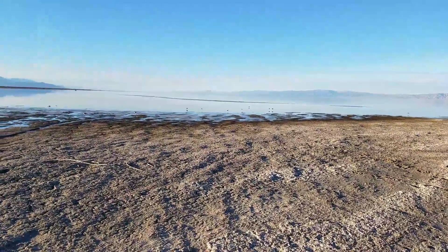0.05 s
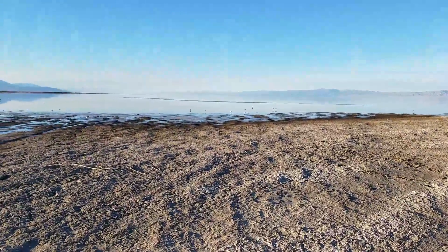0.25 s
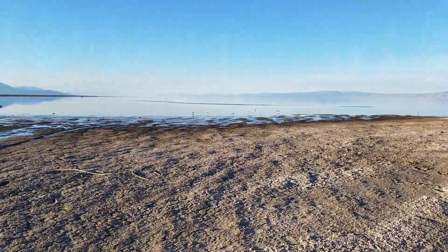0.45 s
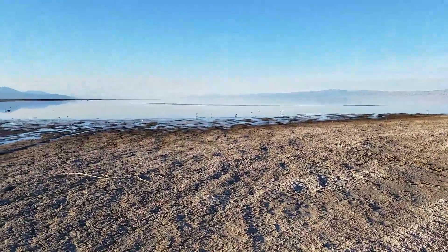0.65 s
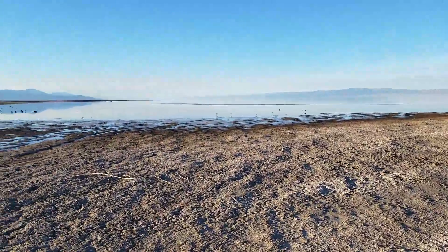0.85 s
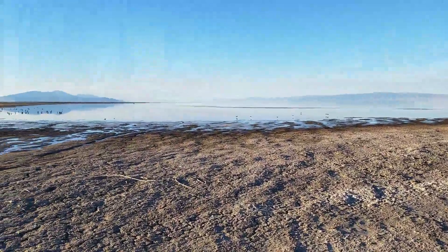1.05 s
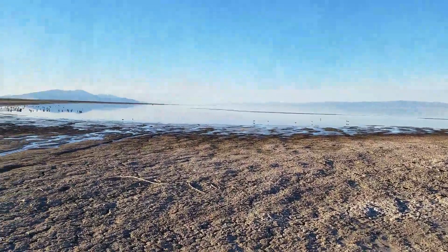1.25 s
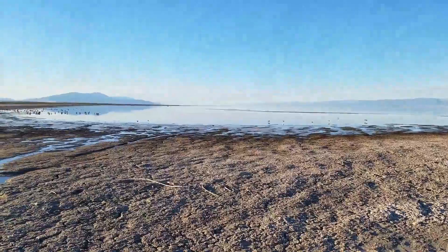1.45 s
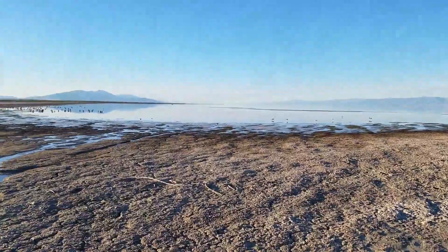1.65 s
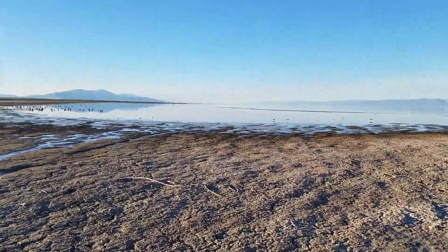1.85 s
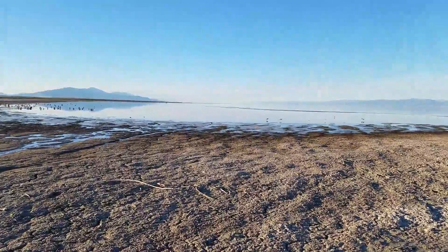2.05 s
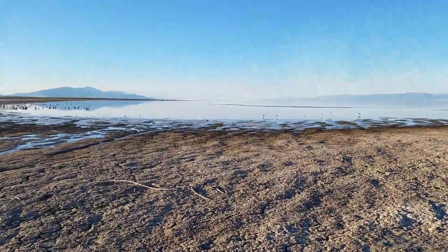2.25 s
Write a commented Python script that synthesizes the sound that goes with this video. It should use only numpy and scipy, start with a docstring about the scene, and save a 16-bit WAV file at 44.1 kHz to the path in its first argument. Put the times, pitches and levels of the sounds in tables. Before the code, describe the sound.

Slow footsteps crunch on dry, crusty ground, heard close up outdoors. The first and longest step crackles from about 0.2 to 0.7 seconds, the second from 1.0 to 1.4, and the third from 1.8 to 2.1. Each mixes brittle snaps and crumbling grit with a soft, dull knock of the sole. Loose crumbs tick between the steps, over a very faint hiss of air.

```python
"""Dry crust crackles and snaps under three slow steps on a lake shore, heard from the walker's hand.
Each foot crushes the crust into crumbs and fine grit, and plates of it break with a click.
The sole knocks on the firmer ground below, and loose crumbs tick between the steps.
Behind it all, light air hisses and brushes the microphone."""
import sys
import numpy as np
from scipy import signal
from scipy.fft import rfft, irfft, next_fast_len
from scipy.io import wavfile
from scipy.ndimage import uniform_filter1d

SR = 44100
rng = np.random.default_rng(int(sys.argv[2]) if len(sys.argv) > 2 else 0)


def pcm_store(signal):
    """Save signal as 16-bit PCM."""
    levels = np.round(np.clip(np.atleast_2d(signal), -1, 1) * 32767)
    wavfile.write(sys.argv[1], SR, levels.astype(np.int16).T)


N = 101429
TIME = np.arange(N) / SR


def from_db(db):
    """Turn decibels into a number to multiply by."""
    return 10 ** (np.asarray(db) / 20)


def unit_power(x):
    """Scale a sound so that its average power is 1."""
    return x / np.sqrt(np.mean(x ** 2) + 1e-20)


def colour(x, points, share=1):
    """Turn lows and highs up or down along (pitch_hz, gain_db) points; share scales the decibels."""
    size = 2 * next_fast_len(x.shape[-1])
    hz, db = np.transpose(points)
    outline = np.interp(np.log(np.arange(size // 2 + 1) * SR / size + 1), np.log(hz), db)
    cepstrum = irfft(np.log(from_db(share * outline)))
    cepstrum[1:size // 2] *= 2  # folded forward, so nothing rings ahead of a click
    cepstrum[size // 2 + 1:] = 0
    return irfft(rfft(x, size) * np.exp(rfft(cepstrum)))[..., :x.shape[-1]]


def ring(x, hz, cycles):
    """Make a sound ring at one pitch, fading by 60 dB in so many cycles."""
    r = np.exp(-np.log(1000) * hz / (cycles * SR))
    feedback = [1, -2 * r * np.cos(2 * np.pi * hz / SR), r * r]
    return signal.lfilter(np.array([1, 0, -1]) * (1 - r * r) / 2, feedback, x + 1e-18)


def stereo(mid, side, width):
    """Make left and right from a shared part (mid) and an opposite part (side)."""
    return np.array([mid + width * side, mid - width * side]) / np.sqrt(1 + width ** 2)


def add(out, start_s, level_db, sound, window_s=0.002):
    """Mix in a short sound; its level is its energy spread over window_s."""
    start = int(start_s * SR)
    power = np.sum(np.mean(np.atleast_2d(sound) ** 2, axis=0)) / (window_s * SR)
    out[:, start:start + sound.shape[-1]] += from_db(level_db) * sound[..., :N - start] / np.sqrt(power)


def swells(rows):
    """A volume curve with one smooth rise and fall for each row."""
    return sum(from_db(db) * np.exp(-((TIME - peak_s) / half_s) ** 2) for peak_s, db, half_s in rows)


def clicks(per_s):
    """Clicks of random size at random times."""
    return rng.standard_normal(N) * (rng.random(N) < per_s / SR)


# how the sound leans to the right, before each side takes its share: pitch_hz, lean_db
RIGHT_LEAN = [(120, 3), (500, 1.5), (1400, 3.5), (2900, 5.5), (4500, 1.5), (5900, 10.5), (7700, 10.5),
              (9200, 2.5), (12000, -8.5), (15000, 5)]

def microphone(pair, share=1):
    """Each side of the microphone colours the sound in its own way."""
    left, right = pair
    return np.array([colour(left, RIGHT_LEAN, -0.76 * share), colour(right, RIGHT_LEAN, 0.63 * share)])


# tone of the hiss and of the puffs: pitch_hz, gain_db
HISS_COLOUR = [(60, 0.5), (380, 1.5), (700, -2.5), (1800, -4.5), (3200, -8), (5000, -17.5), (10000, -18),
               (16000, -12.5)]
PUFF_COLOUR = [(35, -13), (65, 5), (120, -2.5), (220, -38.5)]
# puffs of air: peak_s, level_db, half_length_s
PUFFS = [(1.405, -60.5, 0.021), (1.513, -66, 0.015), (1.795, -63, 0.025)]

def air(hiss_db=-66):
    """Open air hisses quietly, and soft, low puffs brush the microphone."""
    hiss = unit_power(colour(stereo(*rng.standard_normal((2, N)), width=0.75), HISS_COLOUR))
    rumble = unit_power(colour(rng.standard_normal((2, N)), PUFF_COLOUR))
    return from_db(hiss_db) * hiss + swells(PUFFS) * rumble


def reflections(x, level_db=-11.5, fade_s=0.015):
    """The rough ground and the walker's body throw back a faint, very short echo."""
    t = TIME[:SR // 5]
    tail = rng.standard_normal((2, len(t))) * np.exp(-np.log(1000) * t / fade_s)
    tail = stereo(*tail, width=0.1) / np.sqrt(np.sum(tail[0] ** 2))
    return from_db(level_db) * signal.fftconvolve(x, tail, axes=1)[:, :N]


# light scuffs of the shoe: peak_s, level_db, half_length_s
SCUFFS = [(1.621, -49, 0.0035), (1.657, -60.5, .004), (1.727, -63, 0.004), (2.249, -59, 0.0044)]
# their tone: pitch_hz, gain_db
SCUFF_COLOUR = [(900, -10.5), (3300, 0), (5000, -19), (11500, -9), (13000, -34)]

def scuffs():
    """The shoe grazes the surface in tiny bursts of hiss."""
    hiss = colour(stereo(*rng.standard_normal((2, N)), width=1), SCUFF_COLOUR)
    return swells(SCUFFS) * unit_power(hiss)


# the flat of the sole bears down: peak_s, level_db, half_length_s
PRESSES = [(.265, -47, 0.018), (.44, -55.5, 0.14), (1.815, -58.5, 0.036), (2.14, -66, 0.12)]

def presses(band_hz=(351, 844)):
    """The sole presses crumbs into the ground and muffles their clicks."""
    muffle = signal.butter(2, band_hz, "band", fs=SR, output="sos")
    return swells(PRESSES) * unit_power(signal.sosfilt(muffle, clicks(per_s=900)))


# knocks of the sole on the ground: start_s, ground_db, ground_pitch_hz, sole_pitch_hz, sole_db
KNOCKS = [(0.4087, -35.5, 500, 616, -45.5), (0.5088, -43.5, 270, 925, -39), (1.249, -45, 300, 1040, -41.5),
          (1.9083, -38, 450, 700, -36), (2.0018, -47, 280, 980, -41.5), (2.0895, -52.5, 357, 820, -51),
          (2.152, -58, 477, 1110, -59)]

def knocks(ground_cycles=3.3, sole_cycles=4.5):
    """The sole meets firm ground; each gives a dull note that dies in a few cycles."""
    out, t = np.zeros((2, N)), TIME[:SR // 20]
    for start_s, ground_db, ground_hz, sole_hz, sole_db in KNOCKS:
        for hz, db, cycles in ((ground_hz, ground_db, ground_cycles), (sole_hz, sole_db, sole_cycles)):
            turns = hz * t
            rise_and_fall = (1 - np.exp(-2 * turns)) * np.exp(-np.log(1000) * turns / cycles)
            thud = np.sin(2 * np.pi * turns) * rise_and_fall
            low_cut = signal.butter(2, 0.66 * hz, "high", fs=SR, output="sos")
            add(out, start_s, db, signal.sosfilt(low_cut, thud))
    return out


# broad slabs of crust crumble: peak_s, level_db, half_length_s, pitch_hz
SLABS = [(0.305, -47.5, 0.035, 1470), (1.16, -54, 0.1, 1730)]
CRUMBS_PER_S, PLATE_CYCLES = 2300, 3.45

def slabs(slab_cycles=17):
    """Many small breaks keep the slab under the foot ringing."""
    breaks = clicks(CRUMBS_PER_S)
    return sum(swells([swell]) * unit_power(ring(ring(breaks, hz, slab_cycles), hz, PLATE_CYCLES))
               for *swell, hz in SLABS)


def grains(level_db, per_s, pitches_hz, tone, spread_db, cycles, width):
    """Tiny random breaks, each with its own size, pitch and side, together held to the given level."""
    born = rng.random(N) < per_s / SR
    sizes = born * from_db(spread_db * np.minimum(rng.exponential(1, N), 3.5)) * rng.choice([-1, 1], N)
    pitch_choice = rng.integers(0, len(pitches_hz), (2, N))
    kicks = np.array([sizes, sizes * rng.choice([-1, 1], N)])
    pings = sum(ring(kicks * (pitch_choice == k), hz, cycles) / np.sqrt(hz)
                for k, hz in enumerate(pitches_hz))
    crackle = unit_power(stereo(*colour(pings, tone), width))
    power = np.mean(crackle ** 2, axis=0)
    smooth_power = uniform_filter1d(uniform_filter1d(power, size=900), size=900)
    return crackle * from_db(level_db) / np.sqrt(np.abs(smooth_power) + 1e-6)


# how loudly the crust crumbles through each step: time_s, crumb_db, grit_db
STEP_1 = [(0, -66, -71), (.07, -66.5, -70), (.09, -60.5, -67), (0.194, -62, -68), (.222, -48.5, -57),
          (.252, -50.5, -56.5), (0.264, -46.5, -51), (0.318, -48, -59.5), (0.388, -49.5, -58),
          (.46, -47.5, -55), (0.501, -61.5, -61.5), (0.524, -49.5, -57), (0.565, -56.5, -61),
          (.6, -57, -65), (.69, -60.5, -67), (0.809, -65.5, -73.5), (0.918, -61, -69), (0.999, -69.5, -75)]
STEP_2 = [(1.033, -67.5, -66), (1.049, -46.5, -52), (1.082, -46, -53), (1.109, -51.5, -55),
          (1.166, -55, -60), (1.21, -56, -64), (1.256, -50, -63.5), (1.293, -55, -67),
          (1.324, -48.5, -57.5), (1.37, -60.5, -69.5), (1.46, -69, -76), (1.559, -72.5, -74.5)]
STEP_3 = [(1.754, -70, -72.5), (1.79, -54.5, -63), (1.797, -45, -50), (1.831, -52, -57),
          (1.863, -56.5, -64.5), (1.95, -56.5, -65.5), (2.025, -65, -72), (2.125, -67.5, -73.5),
          (2.3, -76, -77)]
# tone of the crumbs and of the fine grit: pitch_hz, gain_db
CRUMB_COLOUR = [(110, -38.5), (270, 0), (470, -3.5), (750, -2), (1050, -3), (1550, 0), (2050, 3),
                (2700, -2), (4000, -9.5), (5200, -19.5), (9000, -29)]
GRIT_COLOUR = [(1500, -37), (3500, 6), (4500, -6), (6000, -8.5), (7800, -3), (9300, -5.5), (12000, -7),
               (16000, -2.5)]

def crunch(grit_per_s=5000, rate_growth=0.55):
    """The foot's weight crushes the crust into crumbs and grit; a harder push breaks more grains."""
    time_s, crumb_db, grit_db = np.transpose(STEP_1 + STEP_2 + STEP_3)
    crumb_db, grit_db = np.interp(TIME, time_s, crumb_db), np.interp(TIME, time_s, grit_db)
    crumb_rate = CRUMBS_PER_S * from_db(rate_growth * (crumb_db + 50))  # base rate at -50 dB
    grit_rate = grit_per_s * from_db(rate_growth * (grit_db + 60))  # base rate at -60 dB
    crumbs = grains(crumb_db, crumb_rate, np.linspace(430, 4000, num=30), CRUMB_COLOUR,
                    spread_db=3, cycles=3.2, width=0.43)
    grit = grains(grit_db, grit_rate, np.linspace(4000, 15500, num=24), GRIT_COLOUR,
                  spread_db=5, cycles=18.5, width=1)
    return crumbs + grit


# plates of crust break: break_s, level_db, pitch_hz, crumble_s, crack_db
SNAPS = [(0.033, -56.5, 1550, 0.00023, -54.5), (0.0858, -42.5, 2010, 0.0027, -49.5),
         (.1160, -48.5, 2200, 0.00089, -48.5), (0.1383, -48.5, 2540, 0.0015, -52),
         (0.1832, -48, 1670, 0.0022, -49), (0.219, -43.5, 3030, 0.00043, -36),
         (0.258, -31, 1420, 0.0014, -41), (0.2624, -31, 1600, 0.0021, -57),
         (0.274, -38.5, 1930, 0.00088, -49), (0.2905, -45, 1600, .0015, -48),
         (0.2962, -37, 1450, 0.0015, -50), (0.306, -37, 1460, 0.0013, -43),
         (0.3087, -34, 1420, 0.0011, -44), (0.336, -38, 1900, 0.0035, -45),
         (0.3495, -36, 1580, 0.00075, -63), (.3711, -28.5, 1650, 0.00065, -46),
         (0.4251, -40, 2210, 0.00095, -62), (0.452, -38.5, 1200, 0.00051, -59),
         (.4808, -35.5, 1380, 0.0008, -45), (0.5234, -35.5, 1920, 0.00027, -41.5),
         (0.5338, -43, 1900, 0.00027, -67), (0.5448, -37.5, 1510, 0.0013, -48),
         (0.5617, -42.5, 1680, 0.0005, -46), (0.5707, -44.5, 1750, 0.00066, -50.5),
         (0.614, -49.5, 1820, 0.00069, -54), (0.632, -46.5, 2260, 0.00079, -50.5),
         (0.6496, -56, 2300, 0.00084, -46), (0.6774, -41.5, 1600, 0.00031, -52),
         (.6880, -53.5, 2350, 0.00053, -51), (0.739, -51, 1720, 0.00018, -51),
         (0.7695, -45, 2100, 0.00067, -55.5), (0.827, -54, 1480, 0.00036, -70),
         (0.916, -50.5, 1670, 0.0006, -56.5), (1.0232, -47, 1860, 0.0035, -70),
         (1.0403, -36, 1730, 0.0028, -48), (1.08, -33.5, 1750, 0.0022, -37),
         (1.122, -40, 1660, 0.0039, -57), (1.1590, -37.5, 1680, 0.0021, -50),
         (1.1829, -39.5, 1900, 0.0026, -47), (1.2720, -49.5, 2100, 0.00082, -53),
         (1.3198, -43.5, 2040, 0.00034, -63), (1.3292, -38.5, 1660, 0.001, -55),
         (1.3490, -46.5, 2070, 0.0015, -60), (1.3544, -46.5, 2010, 0.0011, -51),
         (1.3880, -51, 2050, .0015, -67), (1.4251, -57, 2180, 0.00087, -66),
         (1.485, -49.5, 1910, 0.00054, -53), (1.768, -43, 1520, 0.0033, -55),
         (1.834, -41, 1540, 0.0024, -48), (1.8732, -58, 1740, 0.00056, -53),
         (1.9069, -36, 1880, 0.0035, -44), (1.9645, -43.5, 2100, 0.00013, -62),
         (2.0570, -47.5, 1780, 0.0027, -55.5), (2.2436, -48.5, 1480, 0.00027, -64.5)]
# tone of their ringing: pitch_hz, gain_db
SNAP_COLOUR = [(150, -18.5), (430, 12), (1000, 3), (2000, 2), (3100, 0), (4200, -9.5), (5500, -16),
               (12000, -4.5)]

def snaps(splinter_size=0.31):
    """A plate splinters, breaks with a click and crumbles; it rings briefly under a bright crack."""
    out = np.zeros((2, N))
    t = TIME[:SR // 16] - TIME[SR // 60]  # zero at the break
    for break_s, level_db, pitch_hz, crumble_s, crack_db in SNAPS:
        noise = rng.standard_normal((4, len(t)))
        fade = np.exp(-np.abs(t) / crumble_s)
        build_up = (t < 0) * 0.13 * fade ** (1 / 1.06)
        splinters = build_up + (t >= 0) * fade * (1 - fade)
        force = np.array([(t == 0) + splinter_size * noise[0] * splinters, noise[1] * splinters])
        cycles = PLATE_CYCLES + 770 * crumble_s  # a larger plate crumbles for longer and rings on
        mid, side = colour(ring(force, pitch_hz, cycles), SNAP_COLOUR)
        add(out, break_s + t[0], level_db, stereo(unit_power(mid), unit_power(side), width=0.029))
        crack_shape = build_up * np.sqrt(fade) + (t >= 0) * (1 - fade ** 2) * fade ** (1 / 0.63)
        crack = colour(stereo(noise[2], noise[3], width=1) * crack_shape, GRIT_COLOUR)
        add(out, break_s + t[0], crack_db, crack)
    return out


def scene(narrow_below_hz=2000):
    """The footsteps, a little to the right, in quiet open air."""
    feet = crunch() + slabs() + snaps() + knocks() + presses() + scuffs()
    left, right = feet + reflections(feet)
    mid = (left + right) / 2
    low_cut = signal.butter(1, narrow_below_hz, "high", fs=SR, output="sos")
    side = signal.sosfilt(low_cut, (left - right) / 2)  # the lows reach both sides alike
    return microphone([mid + side, mid - side]) + microphone(air(), share=0.18)


def record(dry, cutoff_hz=15850):
    """Cut off the very highest treble steeply."""
    return signal.sosfiltfilt(signal.ellip(10, .1, 60, cutoff_hz, fs=SR, output="sos"), dry)


dry = scene()
out = record(dry)
pcm_store(out)
```